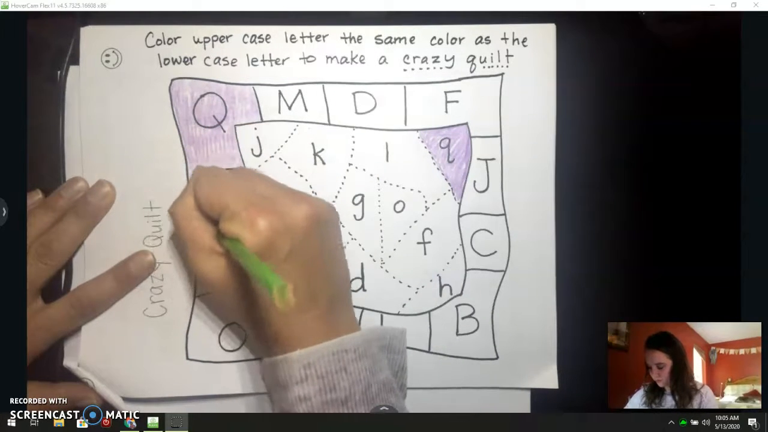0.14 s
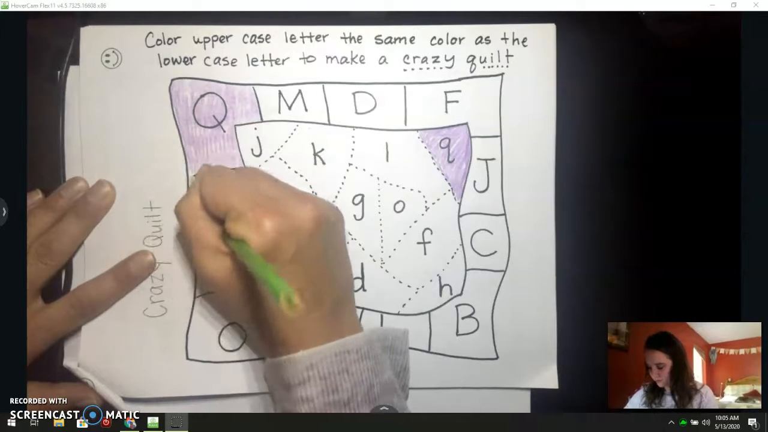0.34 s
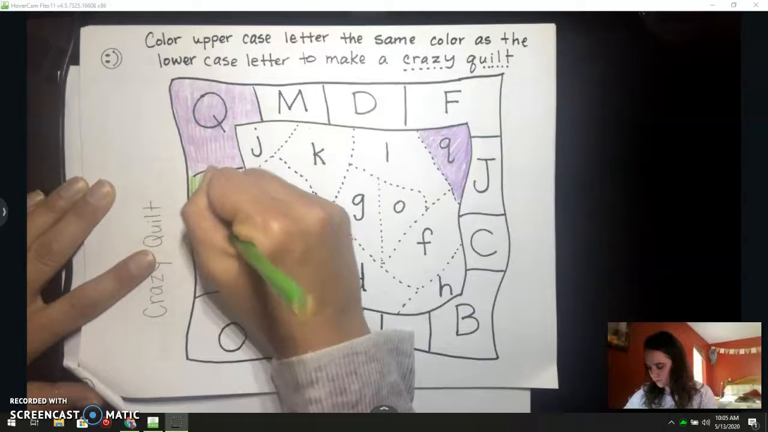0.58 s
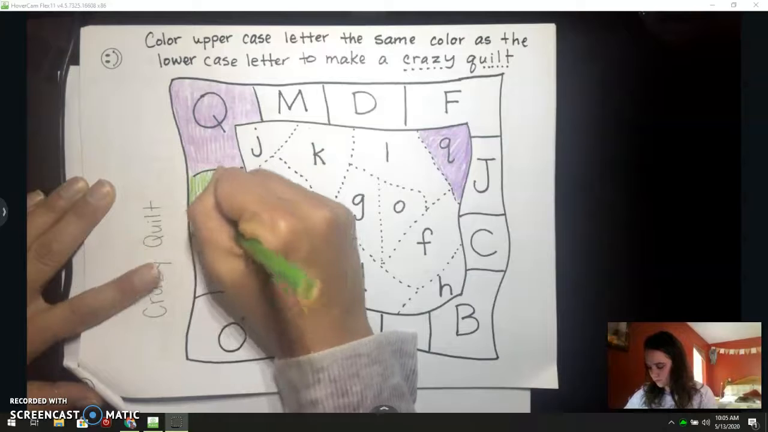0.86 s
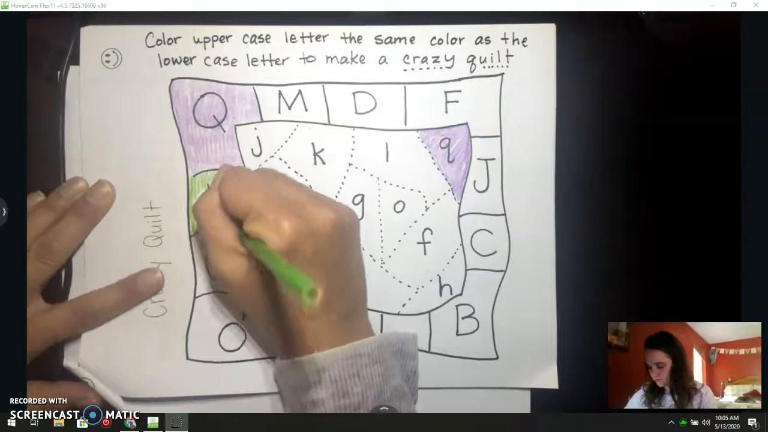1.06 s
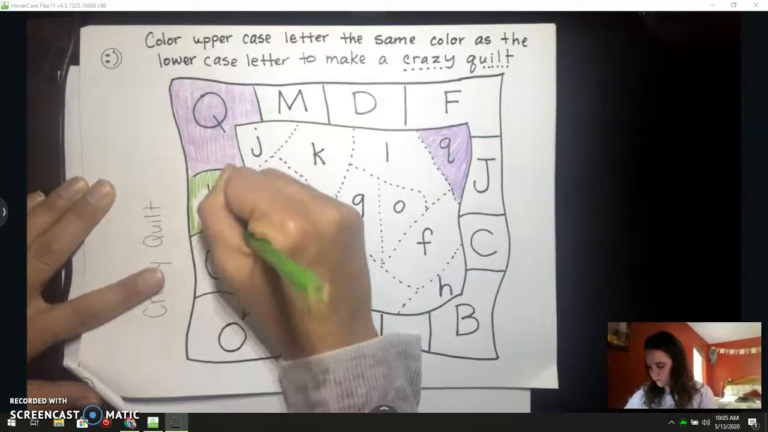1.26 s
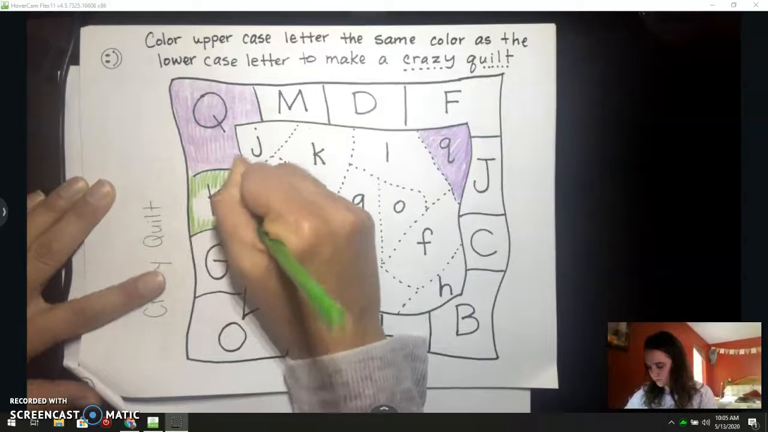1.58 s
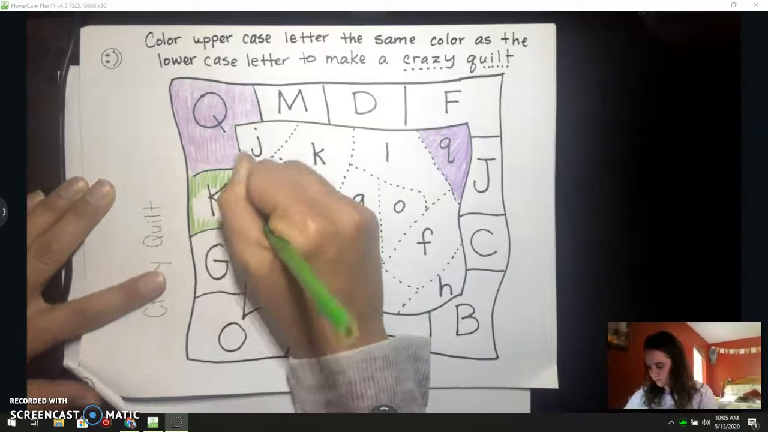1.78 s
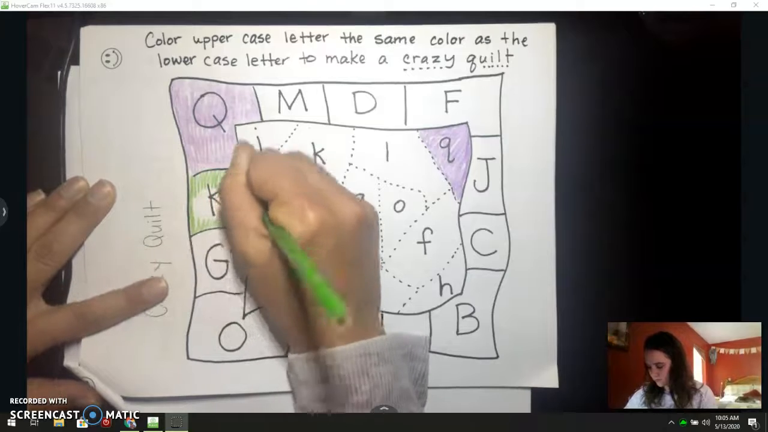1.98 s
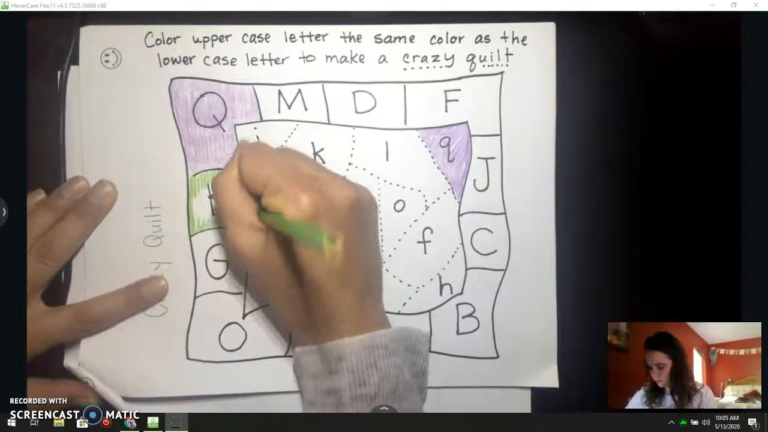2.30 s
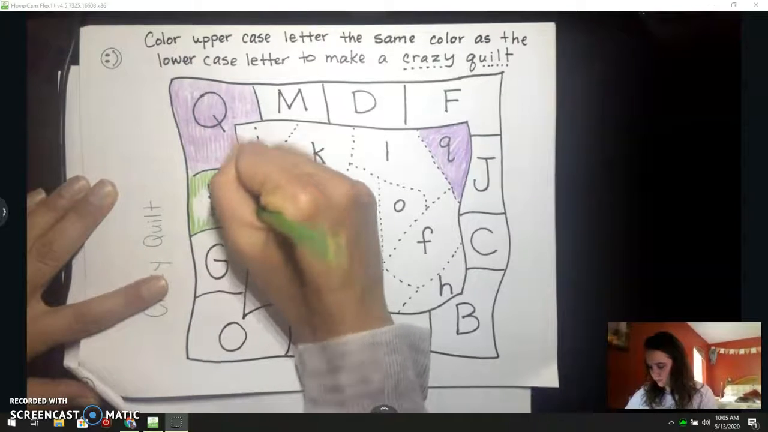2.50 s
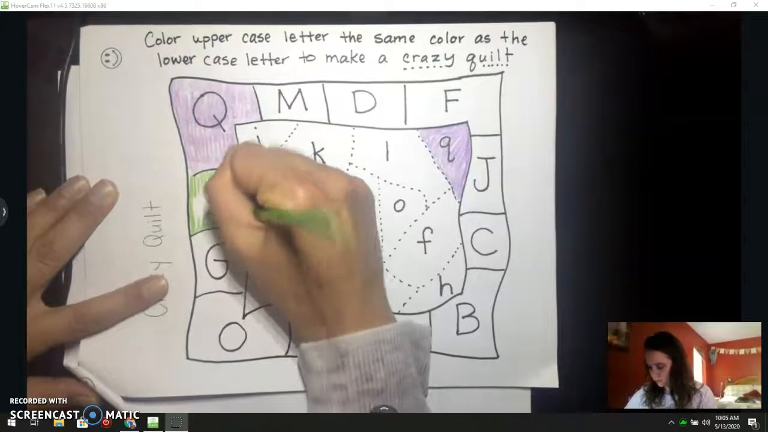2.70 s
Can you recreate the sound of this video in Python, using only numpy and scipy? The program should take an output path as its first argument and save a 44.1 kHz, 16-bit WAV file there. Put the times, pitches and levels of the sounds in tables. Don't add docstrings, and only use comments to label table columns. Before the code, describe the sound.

A coloured pencil scratches paper in quick back-and-forth strokes from 0 to 3 seconds, each a short grainy hiss, around eleven a second at first, easing to nine after 1.3. Woody knocks with tiny chatter and soft low thumps mark many turns, stronger near 0.35, 0.9, 1.5 and 2.7. Desk rumble and steady fan air lie beneath; small dry room, close muffled laptop microphone.

```python
import sys
import numpy as np
from scipy import signal
from scipy.fft import rfft, irfft, next_fast_len
from scipy.io import wavfile
from scipy.ndimage import uniform_filter1d, map_coordinates

SR = 44100
rng = np.random.default_rng(int(sys.argv[2]) if len(sys.argv) > 2 else 0)


def level_to_linear(level):
    exponent = np.asarray(level, float) / 20
    return 10 ** exponent


def generate_wav(sig):
    pcm = np.round(np.clip(np.atleast_2d(sig).T, -1, 1) * 32767).astype(np.int16)
    wavfile.write(sys.argv[1], SR, pcm)


N = 125685


def unit(x):
    return x / np.sqrt(np.mean(x ** 2) + 1e-20)


def along(points, hz):
    f, v = np.transpose(points)
    return np.interp(np.log(hz + 1), np.log(f + 1), v)


def wobble(rate_hz):
    knots = rng.standard_normal(int(N * rate_hz / SR) + 4)
    return map_coordinates(knots, [np.arange(N) * rate_hz / SR])


def filtered(x, response):
    m = next_fast_len(N + SR // 2)
    return irfft(rfft(x, m) * response(np.fft.rfftfreq(m, 1 / SR)), m)[:N]


def bumps(peaks, f):
    return sum(level_to_linear(2 * db) / (1 + (2 * (f - hz) / width) ** 4) for hz, width, db in peaks)


# hz, level_db_per_hz
AIR_SPECTRUM = [(120, -33.5), (200, -1), (400, -6), (1000, -3), (2300, -9), (2900, -16.5), (4700, -21),
                (7300, -23)]
# hz, width_hz, level_db over the air
DUCT_MODES = [(242, 34, 1), (325, 37, 3), (530, 80, 0), (840, 35, -1), (612.6, 200, 3), (907, 90, -2),
              (1203, 110, 1.5), (1520, 180, -1.5), (2165, 450, 1)]


def fan():
    air_db, patchy_db = -56, 0.58
    z = signal.stft(rng.standard_normal(N + 512), nperseg=512)[2]
    patches = uniform_filter1d(rng.standard_normal(z.shape), 5, 0)
    patches = uniform_filter1d(patches, 10, 1)
    air = signal.istft(z * level_to_linear(patchy_db * unit(patches)), nperseg=512)[1][:N]

    def duct(f):
        return level_to_linear(along(AIR_SPECTRUM, f)) * np.sqrt(1 + bumps(DUCT_MODES, f))

    return level_to_linear(air_db) * unit(filtered(air, duct))


def sway():
    mode_hz, t60_s, level_db = 15.7, 1.58, -41
    lag_s, rise_s = -0.0037, 0.0094
    t, kicks = np.arange(SR) / SR, np.zeros(N + SR // 2)
    earlier_s = [-.42, -0.25, -0.236, -.13]
    starts_s = np.array(earlier_s + [row[0] for row in STROKES])
    force = (-1) ** np.arange(len(starts_s)) * np.where(starts_s < 0, 1.6, 1)
    kicks[np.round((starts_s + .5) * SR).astype(int)] = force
    mode = level_to_linear(level_db - 60 * t / t60_s) * np.cos(2 * np.pi * mode_hz * (t - lag_s))
    mode = mode * (1 - np.exp(-(t / rise_s) ** 2))
    return signal.fftconvolve(kicks, mode)[SR // 2:][:N]


# start_s, length_s, level_db, peak_place (0-1)
STROKES = [(0.001, 0.022, -75.5, 0), (0.074, 0.045, -63.5, 0.7), (0.152, 0.049, -63, 0),
           (0.246, 0.051, -65.5, 0.1), (0.339, 0.056, -68.5, 0.3), (0.436, 0.04, -63.5, 0.47),
           (0.52, 0.057, -66.5, 0.6), (0.612, 0.056, -65.5, 0.9), (0.703, 0.078, -68.5, 0.5),
           (0.818, 0.051, -66.5, 0.3), (0.917, 0.057, -68.5, 0.45), (1.011, 0.059, -67, 0.6),
           (1.094, 0.05, -67.8, 0.38), (1.178, 0.076, -68, 0.7), (1.289, 0.051, -63.5, 0.7),
           (1.39, 0.079, -65, 0.6), (1.5, 0.057, -65, 0.6), (1.618, 0.066, -64, 0.7),
           (1.72, 0.058, -62, 0.5), (1.836, 0.068, -65, 0.3), (1.944, 0.068, -63.5, 0.36),
           (2.048, 0.098, -65.5, 0.4), (2.17, 0.075, -64, 0.2), (2.279, 0.092, -64, 0.54),
           (2.4, 0.069, -62.5, 0.5), (2.508, 0.073, -63.5, 0.6), (2.618, 0.062, -60, 0.6),
           (2.74, 0.078, -63, 0.4)]


def pressure():
    bite_s, bite_share = .005, .5
    flare, roundness = 1.197, .7
    t, gains = np.arange(N) / SR, []
    for start_s, length_s, level_db, peak in STROKES:
        grip_s = start_s + bite_s
        top_s = grip_s + 0.64 * length_s * np.clip(peak, .1, .9) ** 2.3
        share = np.clip(bite_share * (1.2 - peak), 0, 1)
        times_s = [start_s - bite_s, grip_s, top_s, start_s + flare * length_s]
        shape = np.interp(t, times_s, [0, share, 1, 0])
        gains.append(level_to_linear(level_db) * np.sin(np.pi / 2 * shape) ** roundness)
    return np.array(gains)


# hz, width_hz, level_db
PAPER_MODES = [(720, 350, 10), (910, 50, 1.5), (2245, 540, 5.5), (3843, 300, 3), (4427, 440, 0.5),
               (5460, 270, -7.5), (6200, 440, -5.5), (7340, 440, -16)]


def scratch(rub):
    grains_per_s, grain_spread_db = 9000, 2.5
    level_db, shudder_db, broad_db = 5, 1.03, -9
    push_pitch, drift = 1.024, 0.033
    draw = rng.random((3, N))
    hit = (draw[0] < grains_per_s / SR) * np.sign(draw[1] - .5)
    grains = hit * level_to_linear(-grain_spread_db * np.log(draw[2] + 0.0033))

    def shade(pitch):
        def sheet(f):
            return np.sqrt(bumps(PAPER_MODES, f / pitch) + level_to_linear(2 * broad_db)) * (f > 200)
        return unit(filtered(grains, sheet))

    hiss = rub[0::2].sum(0) * shade(1 / push_pitch)
    hiss += rub[1::4].sum(0) * shade(push_pitch)
    hiss += rub[3::4].sum(0) * shade(push_pitch - drift)
    return level_to_linear(level_db + shudder_db * wobble(60)) * hiss


# hz, level_db_per_hz
RUMBLE_SPECTRUM = [(12, -23), (20, -4.5), (30, -4.5), (45, -6.5), (97, -15), (166, -26), (220, -37),
                   (290, -55)]


def rumble(rub):
    level_db, lumps_db, follows = -50, 1.5, 0.42
    low = filtered(rng.standard_normal(N), lambda f: level_to_linear(along(RUMBLE_SPECTRUM, f)))
    lumpy = low * level_to_linear(lumps_db * wobble(14))
    return level_to_linear(level_db) * unit(lumpy * (1 + follows * unit(rub)))


# start_s, peak_db, pitch_hz, thump_db, chatter_db
KNOCKS = [(0.06, -45.5, 851, -54, -2.5), (0.151, -40.5, 635, -46.5, -1.5), (0.341, -34.5, 670, -44.5, -2.5),
          (0.442, -44, 910, -58, -1), (0.525, -39, 640, -49, -2), (0.713, -39, 649, -49, -1),
          (0.81, -47, 716, -57, -1.5), (0.911, -37, 628, -49.5, -1.5), (1.098, -43.5, 630, -52, -1.5),
          (1.298, -41, 660, -48, -2), (1.507, -36, 667, -49, -1.5), (1.612, -45.5, 840, -56.5, -2),
          (1.724, -40.5, 643, -50, -2), (1.832, -46.5, 720, -54, -1), (1.939, -39.5, 664, -47.5, -2),
          (2.04, -40, 630, -55, -1), (2.168, -44.5, 600, -52, -1), (2.266, -41.5, 703, -51.5, -1),
          (2.527, -44.5, 650, -56.5, -1.5), (2.732, -37, 607, -47.5, 1)]
# hz, level_db, t60_s
TOP_MODES = [(335, -14.5, 0.043), (510, -14, 0.023), (645, -19, .04), (926, -14, .06), (2187, -11.5, .02)]
# delay_s, level_db
CHATTER = [
    (0, 2),
    (.005, -9),
    (.011, -7.5),
    (.023, -12),
]


def knocks():
    blow_db, blow_mid_s, blow_width_s = -1, .0012, .0014
    crack_db, crack_t60_s = -22.5, 0.027
    ring_rise_s, lag_s = .001, .0013
    out, t = np.zeros(N + SR), np.arange(SR // 5) / SR
    for start_s, peak_db, pitch_hz, _, chatter_db in KNOCKS:
        for k, (delay_s, bounce_db) in enumerate(CHATTER):
            bounced = min(k, 1)
            luck = rng.standard_normal(len(TOP_MODES) + 2)
            blow_hz = pitch_hz * (1 + .09 * k * abs(luck[-1]))
            blow = np.sin(2 * np.pi * blow_hz * t) * np.exp(-((t - blow_mid_s) / blow_width_s) ** 2)
            blow *= level_to_linear(blow_db + 1.6 * bounced * luck[-2])
            ring = np.zeros(len(t))
            for (hz, level_db, t60_s), g in zip(TOP_MODES, luck):
                tone = np.sin(2 * np.pi * hz * (1 + 0.025 * g) * t)
                ring += level_to_linear(level_db + 2.2 * g - 60 * t / t60_s) * tone
            ring *= 1 - np.exp(-t / ring_rise_s)
            crack = level_to_linear(crack_db - 60 * t / crack_t60_s) * rng.standard_normal(len(t))
            gain = level_to_linear(peak_db + bounce_db + chatter_db * bounced)
            i = round((start_s + lag_s + delay_s * (1 + .1 * luck[-1])) * SR)
            out[i:i + len(t)] += gain * (blow + ring + crack)
    return out[:N]


def thumps():
    hz, t60_s, level_db, rise_s = 87.7, 0.047, 20.5, .009
    out, t = np.zeros(N + SR), np.arange(SR // 5) / SR
    bounce = level_to_linear(level_db - 60 * t / t60_s) * np.sin(2 * np.pi * hz * t)
    bounce = bounce * (1 - np.exp(-(t / rise_s) ** 2))
    for start_s, _, _, thump_db, _ in KNOCKS:
        nearest = np.argmin([abs(start_s - row[0]) for row in STROKES])
        i = round((start_s + .003) * SR)
        out[i:i + len(t)] += level_to_linear(thump_db) * bounce * (-1) ** (nearest % 2)
    return out[:N]


def room(x):
    t60_s, level_db = .1, -15
    t = np.arange(SR // 4) / SR
    tail = rng.standard_normal(len(t)) * level_to_linear(-60 * t / t60_s) * (t > .003)
    return level_to_linear(level_db) * signal.fftconvolve(x, tail / np.linalg.norm(tail))[:N]


def scene():
    rub = pressure()
    pencil = scratch(rub) + knocks()
    desk = sway() + rumble(rub.sum(0)) + thumps()
    return (fan() + desk + pencil + room(pencil))[None]


def low_pass(x):
    return signal.sosfilt(signal.butter(12, 7240, fs=SR, output="sos"), x)


def record(dry):
    settle_s, top_hz = .008, 7260
    offset = dry[0, :40].mean() * np.exp(-(np.arange(N) / SR / settle_s) ** 2)
    narrow = filtered(dry[0] - offset, lambda f: f < top_hz)
    return low_pass(narrow[None])


dry = scene()
out = record(dry)
generate_wav(out)
```